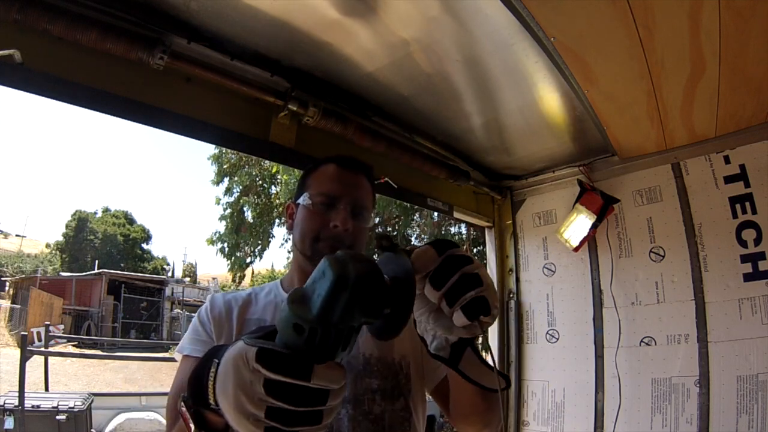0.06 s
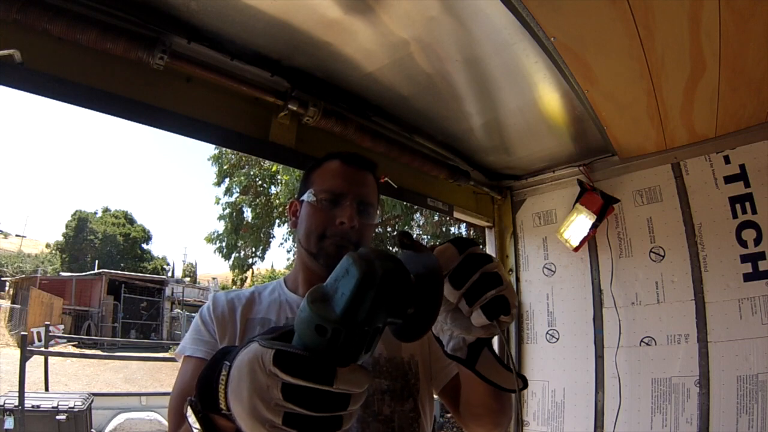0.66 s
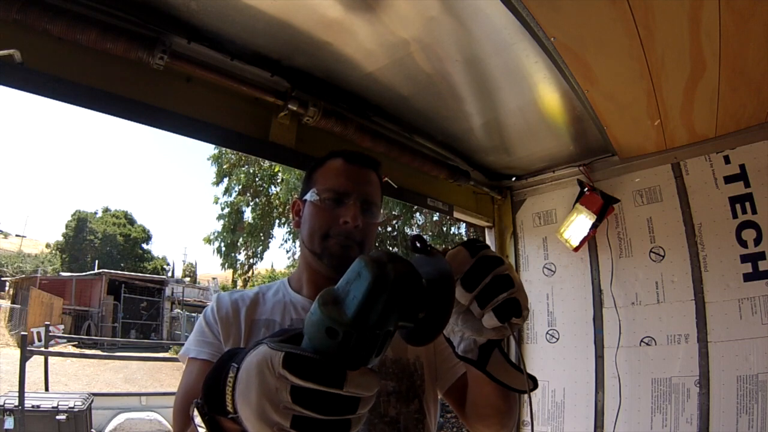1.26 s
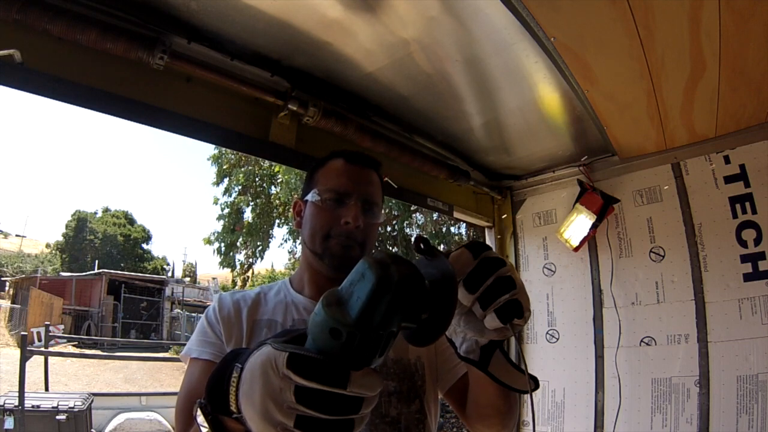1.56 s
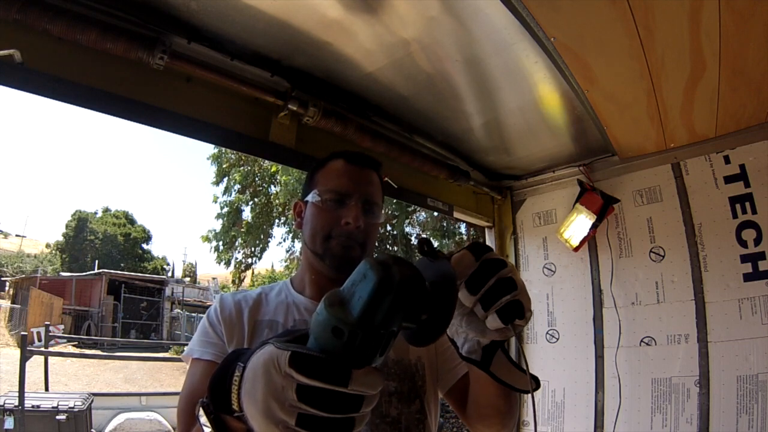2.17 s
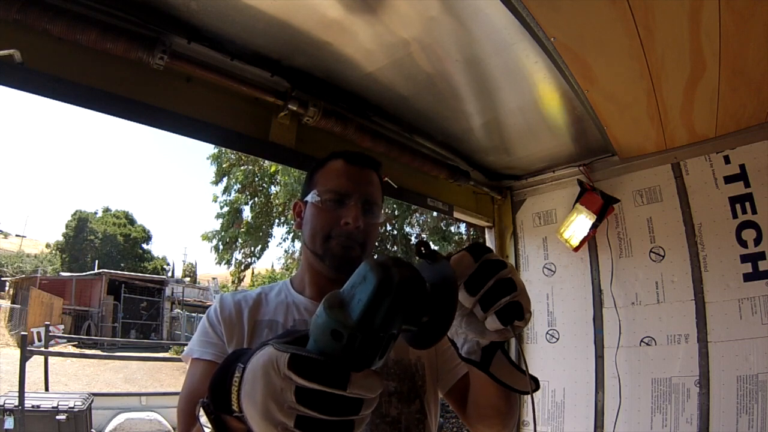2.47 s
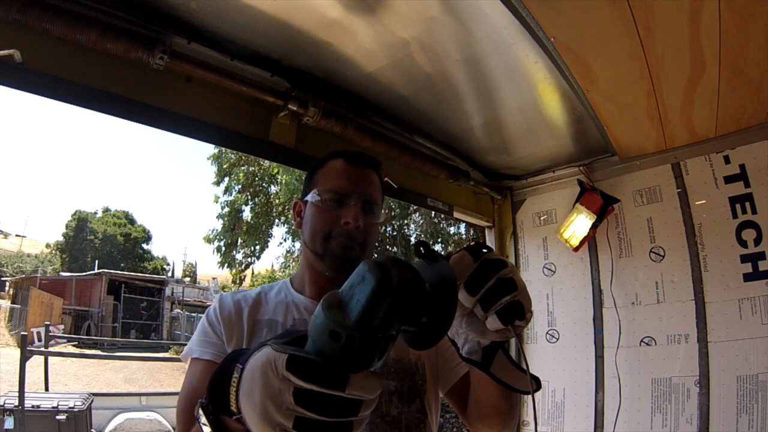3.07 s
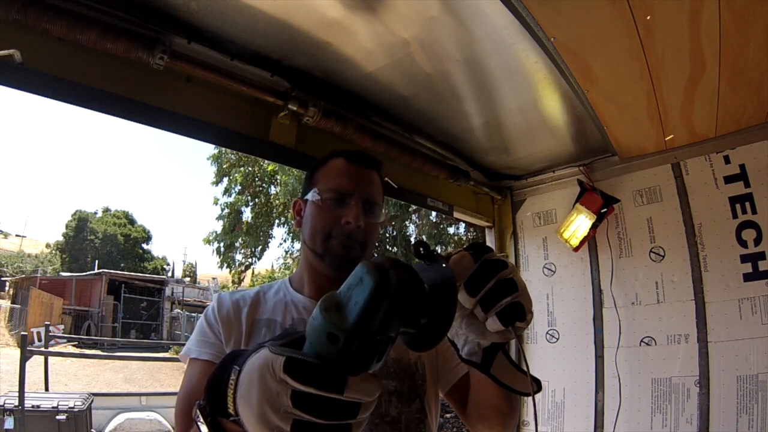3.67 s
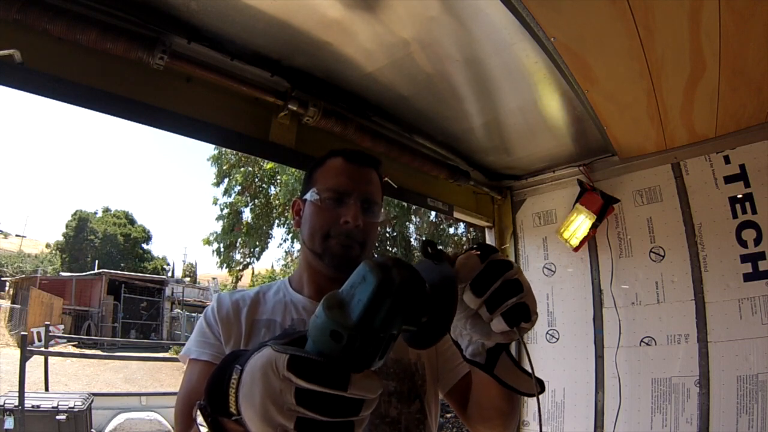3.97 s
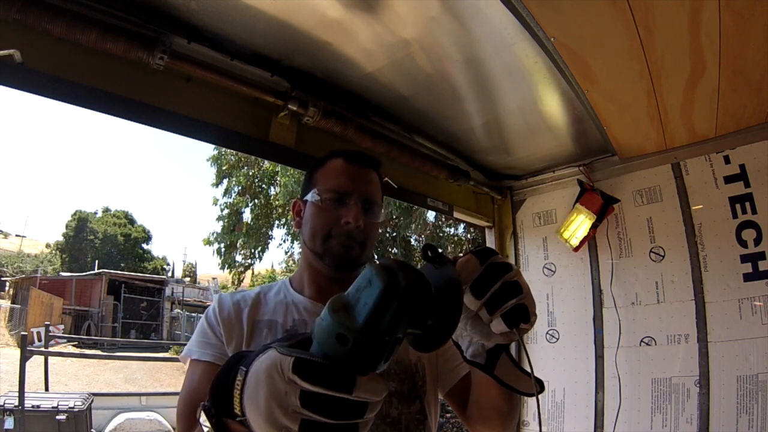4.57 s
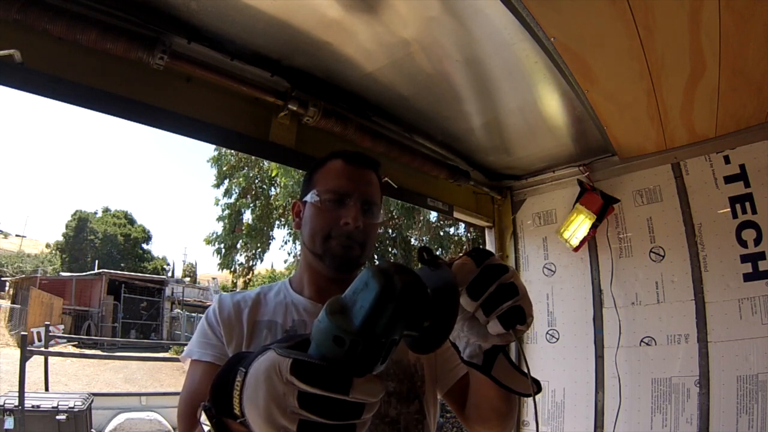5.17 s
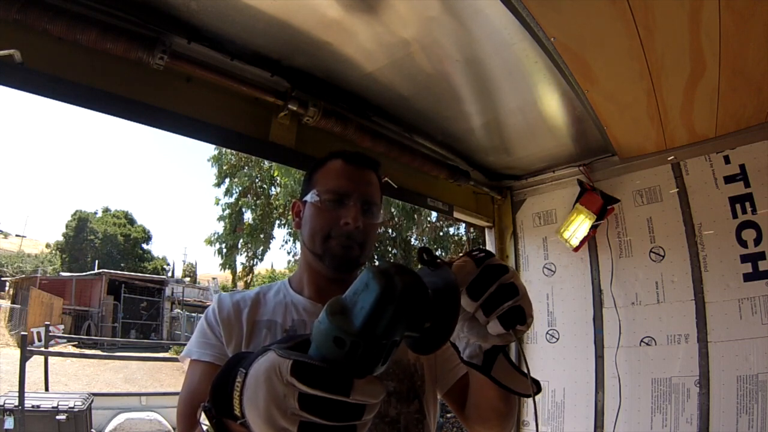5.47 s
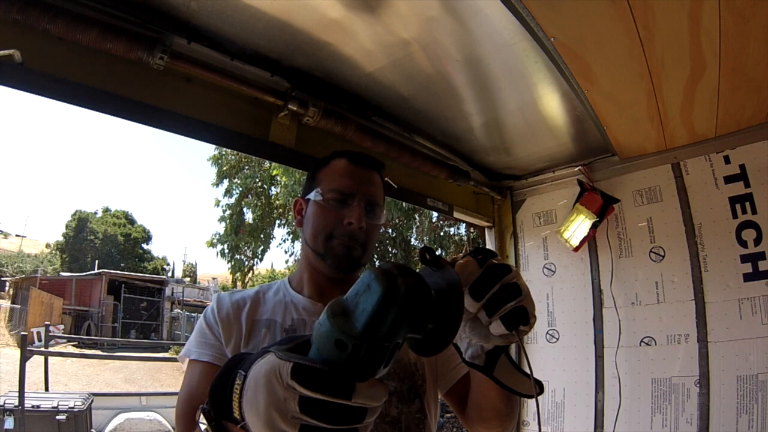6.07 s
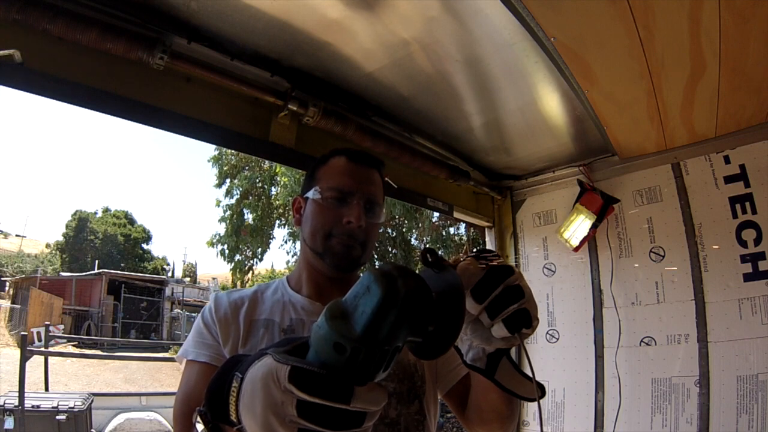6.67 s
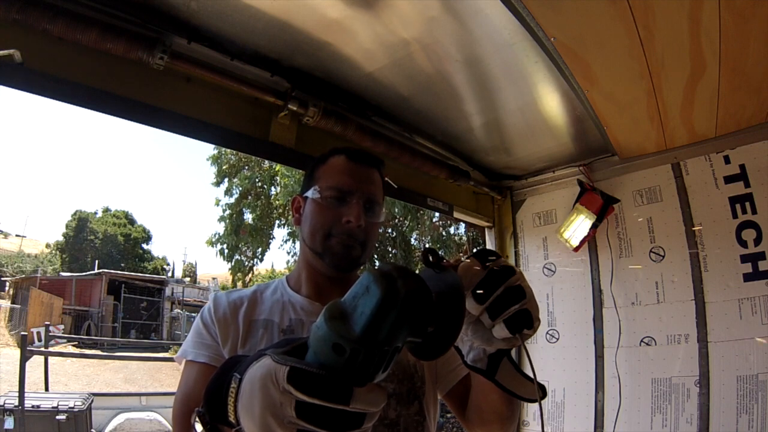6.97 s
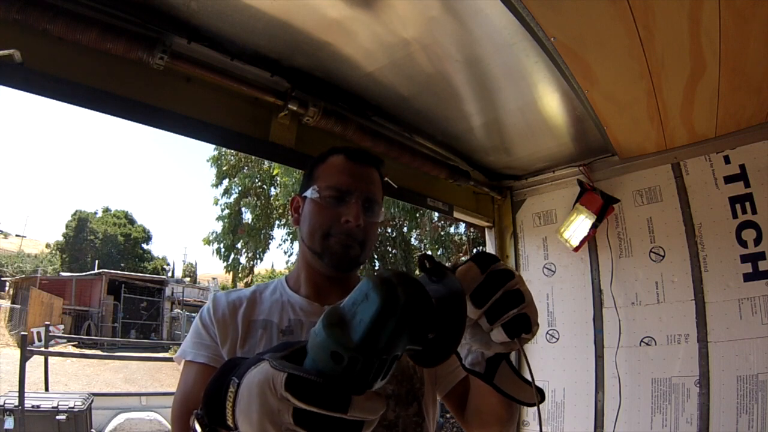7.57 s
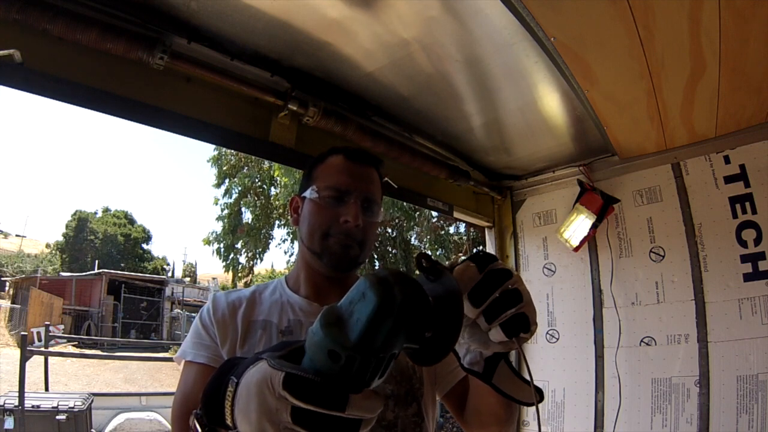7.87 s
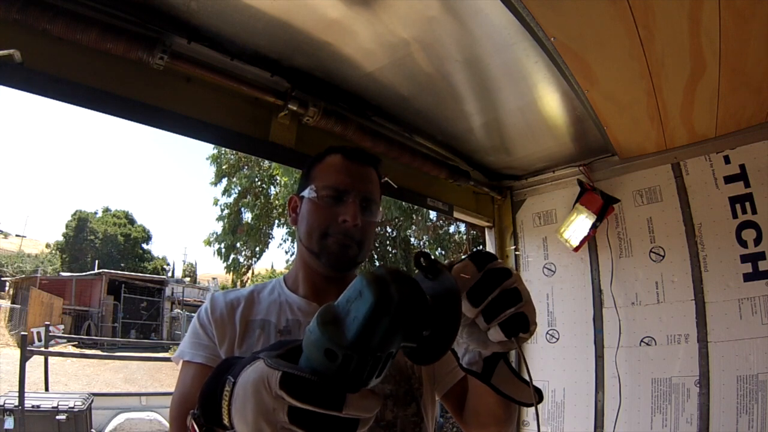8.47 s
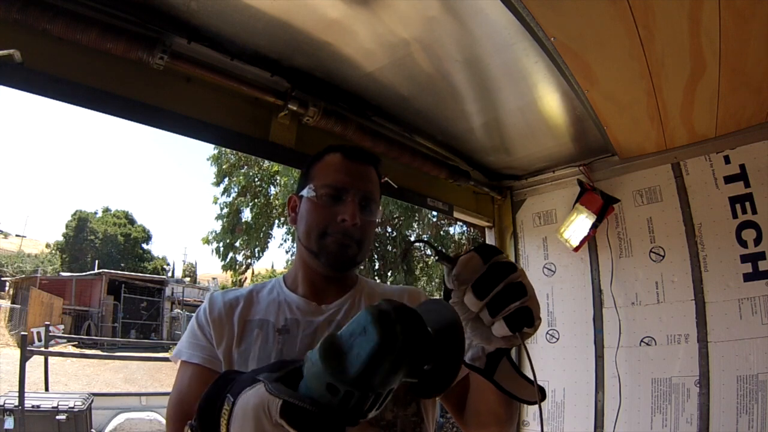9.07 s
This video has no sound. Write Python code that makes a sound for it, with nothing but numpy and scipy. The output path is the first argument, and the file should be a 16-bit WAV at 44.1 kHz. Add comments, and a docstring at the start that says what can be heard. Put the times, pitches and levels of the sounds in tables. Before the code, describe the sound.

A handheld angle grinder cuts steadily into steel near the microphone, its shrill whine mixed with gritty hiss. Brief screeches and ringing squeals come with each push, and the pitch sags a little during the deepest bite. The grinding then stops, leaving a swelling rush of air from the spinning tool, until a small steel piece lands with a sharp clink and the level drops. A faint draught rumbles underneath.

```python
"""An angle grinder works a steel piece, close by. From the start the wheel's high spot slaps the steel
once a turn, and its grit draws a whine, a bright scrape and a rasp over the hum of the gears.
Short screeches break in, and it squeals as it is pushed; near 7 s it bites deep, slows and recovers.
At 8.7 s it is lifted off and runs free in a rush of fan air, and the level comes up.
Half a second later the steel piece clinks down and the level ducks."""
import sys
import numpy as np
from scipy import signal
from scipy.fft import rfft, irfft, next_fast_len
from scipy.io import wavfile
from scipy.ndimage import uniform_filter1d, map_coordinates

SR = 44100
rng = np.random.default_rng(int(sys.argv[2]) if len(sys.argv) > 2 else 0)


def transcribe(u):
    """Save the signal u as a 16-bit wav file named by the first command-line argument.

    u: samples, shape (n,) or (channels, n), limited to [-1, 1]; the rate is SR.
    q: integer samples, one column per channel.
    """
    v = np.clip(np.atleast_2d(u).T, -1, 1)
    q = np.round(v * 32767).astype(np.int16)
    wavfile.write(sys.argv[1], SR, q)


N = 411453

LIFT_OFF_S = 8.718
RING_DB, RING_PER_BITE_DB = -18.6, .7  # base level of whine and scrape, and its rise at full bite
# short screeches, most followed by a brief dip in level: start_s, level_db, length_s, dip_db
SCREECHES = [(.446, -13, .003, 0), (.451, -20, .025, 3.7), (1.64, -23.5, .025, 1.5), (2.234, -15, .008, 0),
             (2.242, -27, .022, 4), (3.903, -17.5, .03, 3.5), (4.209, -20, .035, .5), (6.835, -21, .03, .5),
             (7.285, -22.5, .05, 0), (7.39, -27, .035, 2.5), (8.732, -19, .006, 0), (8.779, -24, .012, 0)]
# the steel piece is set down and bounces: start_s, level_db
CLINKS = [(9.2645, -5), (9.2805, -17), (9.311, -24)]
# sound cut by fine grit all round the rim, not by the high spot: frequency_hz, power_share
ALL_ROUND = [(3500, 0.76), (5600, 0.32), (6200, 0.026), (7300, 0.022), (8200, 0.65), (13000, 0.54)]


def amp(db):
    """Decibels to gain."""
    return 10 ** (np.asarray(db) / 20)


def unit(x):
    """Scale to rms 1."""
    return x / np.sqrt(np.mean(x ** 2) + 1e-20)


def along(points, hz):
    """Read (frequency_hz, value) points on a log axis."""
    frequencies, values = np.transpose(points)
    return np.interp(np.log(hz + 1), np.log(frequencies + 1), values)


def curve(points, t):
    """Read (time_s, value) points at times t."""
    return np.interp(t, *np.transpose(points))


def envelope(age, held_s, attack_s, release_s):
    """A linear attack, a hold and an exponential release."""
    return np.clip(age / attack_s, 0, 1) * np.exp(-np.maximum(age - held_s, 0) / release_s)


def wobble(rate):
    """A smooth random curve, rate knots a second."""
    knots = rng.standard_normal(int(N * rate / SR) + 4)
    smooth = signal.resample(knots, len(knots) * 10)
    return np.interp(np.arange(N), np.linspace(0, N, len(smooth)), smooth)


def filtered(x, response):
    """Filter x with a complex response of frequency."""
    size = next_fast_len(N + SR // 4)
    return irfft(rfft(x, size) * response(np.fft.rfftfreq(size, 1 / SR)), size)[..., :N]


def noise(spectrum, gate=1):
    """Gated noise with a colour, rms 1."""
    return unit(filtered(gate * rng.standard_normal(N), lambda hz: amp(along(spectrum, hz))))


def touching(t):
    """1 while the wheel is on the steel, then 0."""
    return np.clip((LIFT_OFF_S - t) / .012 + .5, 0, 1)


def wheel_speed(t, spin_up_hz_per_s=9):
    """Turns a second: held down by the hand's load, then climbing freely."""
    # speed under load: time_s, rotation_hz
    loaded_speed = [(0.0, 172.1), (0.56, 171.0), (0.92, 170.9), (1.45, 170.0), (1.74, 169.0), (2.18, 168.4),
                    (2.3, 167.0), (3.46, 169.3), (3.88, 169.1), (3.95, 167.7), (4.21, 168.0), (4.26, 167.4),
                    (6.23, 168.9), (6.64, 168.3), (7.25, 166.2), (7.41, 164.2), (7.88, 168.1),
                    (8.31, 169.3), (8.63, 169.0), (8.7, 168.4)]
    return curve(loaded_speed, t) + spin_up_hz_per_s * np.maximum(t - LIFT_OFF_S, 0)


def bite_depth(t, resting=.14, attack_s=.05, release_s=.15):
    """Each push sinks the rim in, then eases out. At 0 only the high spot touches, at 1 all of it cuts."""
    # the hand leans in: start_s, held_s, bite
    pushes = [(2.21, .16, .76), (3.88, .3, .62), (4.4, .85, .33), (6.81, .7, .97), (8.33, .38, .58)]
    extra = [(depth - resting) * envelope(t - start, held, attack_s, release_s)
             for start, held, depth in pushes]
    return np.clip(resting + np.max(extra, axis=0), 0, 1)


def contact(turns, bite, slap_db=11, sharpness=2.4):
    """Contact force around one turn: a bump at the high spot, which flattens as the rim bites."""
    high_spot = np.exp(sharpness * (np.cos(2 * np.pi * turns) - 1))
    return amp(slap_db * (1 - 0.8 * np.clip(bite, 0, 1)) * high_spot)


def resonance_db(hz, width_hz=85):
    """Wheel and steel resonate in contact and lift the frequencies near each peak."""
    # contact resonances: centre_hz, lift_db
    peaks = [(2365, 5.5), (2530, 3.5), (3560, 6.8), (3880, 3.5), (4390, 7), (4890, 4), (5050, 7.5),
             (5560, 3.5), (6240, 5.5), (6490, 3.5), (7090, 4.5), (7400, 6.8), (8200, 7.5), (8420, 3.5),
             (8600, 3.5), (8790, 3), (8940, 8.5), (10150, 4), (10440, 6.5), (10950, 6), (11970, 3.5),
             (12480, 4.5)]
    grid = np.linspace(0, SR / 2, 2 ** 12)
    return np.interp(hz, grid, sum(db * np.exp(-((grid - centre) / width_hz) ** 2) for centre, db in peaks))


def draught(t, level_db=-58.8, duck_db=5.2):
    """A soft draught rumbles on each microphone port, more so once the tool is lifted away."""
    # rumble colour: frequency_hz, relative_db
    rumble = [(20, -2), (45, 1.5), (120, -.5), (260, -1.5), (600, -9), (1500, -26), (4000, -46)]
    gain = amp(level_db - duck_db * touching(t) + 1.5 * wobble(8.5))
    return gain * np.array([noise(rumble), noise(rumble)])


def gear_hum(turns, waver_db=1.5):
    """Spindle and gears hum in wavering tones that follow the wheel's speed."""
    # hum partials: speed_multiple
    orders = [1, 2, 36 / 11, 4, 5, 6, 72 / 11, 14, 15]
    # strength of each partial: level_db
    levels = [-68, -67, -59.5, -52.3, -60.5, -59, -53.5, -53.5, -51]
    return sum(amp(db + waver_db * wobble(9)) * np.sqrt(2)
               * np.sin(2 * np.pi * order * turns + rng.uniform(0, 2 * np.pi))
               for order, db in zip(orders, levels))


def fan_air(t, turns, level_db=-16.3, rise_db=9.5, rise_s=.135, duck_db=13.5, vent_hz=3650, vent_db=3.3):
    """Fan air rushes through the vents of the free-running tool."""
    # air colour: frequency_hz, relative_db
    colour = [(59, -69), (100, -47), (462, -20), (630, -20), (728, -14.5), (993, -14), (1100, -10),
              (1700, -10.5), (2000, -7.5), (2620, -8.5), (3810, -3.5), (6250, -3.5), (7220, -9.5),
              (11900, -26.5), (14000, -36)]
    gusts = contact(turns, 0, slap_db=1.0) * rng.standard_normal(N)
    vents = lambda hz: amp(along(colour, hz) + vent_db / (1 + ((hz - vent_hz) / 250) ** 2))
    rush = unit(filtered(gusts, vents))
    # the airflow is steady; only the gain comes up after lift-off and ducks at the first clink
    held_down = np.exp(-np.maximum(t - LIFT_OFF_S, 0) / rise_s)
    ducked = np.clip((t - CLINKS[0][0]) / .013, 0, 1)
    return (1 - touching(t)) * amp(level_db - rise_db * held_down - duck_db * ducked) * rush


def clinks(crack_db=-11, crack_t60_s=.034, attack_s=.00037):
    """The steel piece rings at each bounce; it is too small to radiate bass."""
    # modes of the free steel: pitch_hz, relative_db, t60_s
    modes = [(3526, -18, .07), (4870, -18, .06), (5222, -23, .1), (6500, -12, .06), (6650, 3.5, 0.037),
             (6680, -13.5, .22), (7500, -8, .04)]
    out, t = np.zeros(N + SR), np.arange(SR // 4) / SR
    for start, db in CLINKS:
        ring = sum(amp(level + rng.normal(0, 1) - 60 * t / t60) * np.sin(2 * np.pi * (hz * t + rng.random()))
                   for hz, level, t60 in modes)
        crack = amp(crack_db - 60 * t / crack_t60_s) * rng.standard_normal(len(t))
        out[round(start * SR):][:len(t)] += amp(db) * (ring + crack) * (1 - np.exp(-t / attack_s))
    return signal.sosfilt(signal.butter(2, [1500, 10000], "band", fs=SR, output="sos"), out[:N])


def screeches(t, turns):
    """Short bursts of contact noise ring the wheel's modes."""
    # modes of the wheel: centre_hz, width_hz, relative_db
    modes = [(2530, 150, -6), (4150, 320, -9), (5300, 250, -3), (6350, 300, -3), (7000, 350, 0),
             (8250, 350, -9), (10300, 700, -15.5), (12300, 600, -23)]
    bursts = sum(amp(db) * np.clip((t - start) / .001, 0, 1)
                 * np.exp(-(np.maximum(t - start, 0) / length) ** 2) for start, db, length, _ in SCREECHES)
    body = lambda hz: sum((-1) ** k * amp(db) * 1j * hz * width / (centre ** 2 - hz ** 2 + 1j * hz * width)
                          for k, (centre, width, db) in enumerate(modes))
    return bursts * unit(filtered(contact(turns, .8) * rng.standard_normal(N), body))


def dips_db(t, attack_s=.016, recovery_s=.1):
    """The level dips briefly after most screeches and soon comes back."""
    total_db = 0
    for start, _, length, dip in SCREECHES:
        age = t - start - length
        total_db -= dip * np.clip(age / attack_s, 0, 1) * np.exp(-(age / recovery_s) ** 2)
    return total_db


def scrape(t, turns, trim_db=-5.0, grain_db=1.0, ringing=0.4, scatter_db=-5.5):
    """Grains tear off fresh steel: a bright scrape in step with the high spot, and a spray of hiss."""
    # scrape colour: frequency_hz, relative_db
    spectrum = [(400, -50), (2470, -23), (3500, -5), (4400, -11), (4960, -9), (5400, 1), (7130, 1.5),
                (7730, -7), (8200, -1.5), (8600, -13), (8950, -10.5), (9450, -19), (10300, -13),
                (11500, -21), (12600, -17.5), (13800, -36)]
    bite = bite_depth(t)
    force = contact(turns, bite, slap_db=9, sharpness=2.2)
    force *= amp(grain_db * wobble(900)) / np.sqrt(uniform_filter1d(force ** 2, size=1024))
    colour = lambda hz: amp(along(spectrum, hz) + ringing * resonance_db(hz))
    slap = filtered(force * rng.standard_normal(N),
                    lambda hz: colour(hz) * np.sqrt(1 - along(ALL_ROUND, hz)))
    hiss = filtered(rng.standard_normal(N), lambda hz: colour(hz) * np.sqrt(along(ALL_ROUND, hz)))
    # the highest hiss scatters off the walls and differs between left and right
    scattered = filtered(rng.standard_normal(N),
                         lambda hz: colour(hz) * amp(scatter_db) / (1 + (8050 / (hz + 1)) ** 12))
    gain = amp(RING_DB + trim_db + (RING_PER_BITE_DB - 3.5) * bite)
    return gain * unit(slap + hiss + np.array([scattered, -scattered]))


def rasp(t, turns, trim_db=-.5):
    """The grit drags over the steel in a broad rasp that barely pulses with the turn."""
    # rasp colour: frequency_hz, relative_db
    colour = [(71, -71), (120, -41.5), (162, -37), (286, -28.7), (537, -18), (619, -21.5), (669, -19),
              (759, -16.7), (1430, -10), (1500, -9.5), (2180, -9.5), (4660, -6), (5200, -4), (6760, -39),
              (11400, -120)]
    # slow swells of the rasp: time_s, level_db
    swells = [(0, -26.7), (4.3, -27.9), (4.95, -24.9), (5.6, -27), (7.3, -28.8), (7.75, -26.3), (8.5, -28)]
    return amp(curve(swells, t) + trim_db) * noise(colour, contact(turns, bite_depth(t), slap_db=0.5))


def rim_harmonics(t, contact_force, wear_rate, evenness, count, size=256):
    """The rim's grit pattern repeats every turn and slowly wears: its harmonics at times t."""
    patterns = rng.standard_normal((size, size))
    wear = np.clip(t * wear_rate, 0, size - 2)
    index, fade = wear.astype(int), (wear % 1)[:, None] * np.pi / 2
    grit = patterns[index] * np.cos(fade) + patterns[index + 1] * np.sin(fade)
    harmonics = rfft(grit * contact_force(np.arange(size) / size))[:, :count]
    harmonics /= np.sqrt(np.mean(abs(harmonics) ** 2, axis=1, keepdims=True))
    harmonics /= (abs(harmonics) ** 2 + .05) ** (evenness / 2)
    return harmonics / np.sqrt(np.mean(abs(harmonics) ** 2))


def whine(turns, comb_db=-4, bite_db=2.0, flutter_db=1.55, frame_hz=100, count=82, size=2048):
    """The grit pattern drives the steel: a comb of wheel harmonics, a few of which sing out."""
    # colour of a light skim: frequency_hz, relative_db
    skim = [(600, -60), (1760, -26), (2400, -19), (3000, -16), (4690, -14.5), (5350, -8), (5920, -2),
            (6460, -1), (7200, -1.5), (7800, -11), (8300, -12.5), (9080, -16.5), (9600, -27),
            (10400, -14.5), (11400, -23), (12500, -17), (13500, -27)]
    # colour of a full cut: frequency_hz, relative_db
    cut = [(1180, -65), (2000, -25), (2520, -9), (2710, -15.5), (3310, -19), (3940, -6), (4630, -16),
           (4930, -7.5), (5390, 3), (5980, -4.5), (6320, -2.5), (6900, -1.5), (9650, -14.5), (10300, -15.5),
           (13500, -23)]
    # harmonics that chatter under a deep bite: speed_multiple
    chatter_orders = [15, 23, 24, 26, 30, 31, 33, 39, 44, 48, 49, 61, 64]
    # strength of each at full bite: level_db
    chatter_db = [-42, -40, -34, -38, -28.5, -33, -30, -32, -32, -37, -36, -42, -42]
    # a harmonic sings as the speed carries it through a mode of the steel:
    # speed_multiple, mode_hz, half_width_hz, off_mode_db, on_mode_lift_db, full_bite_change_db
    singing = [(9, 1508, 5.5, -46.7, 7.3, -3), (32, 5370, 25, -36, 4, 0), (38, 6450, 110, -29.2, 5, -5),
               (41, 6915, 45, -36, 7.5, 0)]
    # the steel locks onto one harmonic and squeals: start_s, held_s, speed_multiple, level_db
    squeals = [(.58, .09, 32, -28), (2.26, .22, 61, -37), (2.39, .09, 32, -23), (3.98, .2, 32, -25.5),
               (3.98, .45, 30, -32), (4.27, .17, 32, -23.5), (6.6, .68, 41, -25.5), (6.85, .37, 32, -26),
               (7.22, .2, 24, -30.5), (7.28, .27, 33, -24), (7.55, .1, 32, -28.5), (7.85, .1, 32, -28.5),
               (8.33, .16, 32, -26), (8.33, .39, 26, -35), (8.42, .3, 33, -27)]
    t = np.arange(int(N / SR * frame_hz) + 2) / frame_hz
    bite = bite_depth(t)[:, None]
    hz = wheel_speed(t)[:, None] * np.arange(count)
    slap_force = lambda angle: contact(angle, bite, slap_db=13, sharpness=1.8)
    slap = rim_harmonics(t, slap_force, wear_rate=3.0, evenness=0.66, count=count)
    fine = rim_harmonics(t, np.ones_like, wear_rate=4.5, evenness=0.73, count=count)
    fine_share = along(ALL_ROUND, hz)
    drive = np.sqrt(1 - fine_share) * slap + np.sqrt(fine_share) * fine

    level = (1 - bite) * amp(along(skim, hz)) + bite * amp(along(cut, hz))
    level *= amp(resonance_db(hz) * (1 - 0.93 * bite))
    level /= np.linalg.norm(level, axis=1, keepdims=True)
    level *= amp(RING_DB + comb_db + (RING_PER_BITE_DB + bite_db) * bite)
    level[:, chatter_orders] = np.maximum(level[:, chatter_orders], bite ** 4 * amp(chatter_db))
    for order, mode_hz, width_hz, db, lift_db, pressed_db in singing:
        detuning = (hz[:, round(order)] - mode_hz) / width_hz
        level[:, round(order)] = amp(db + lift_db / (1 + detuning ** 2) + pressed_db * bite[:, 0])
    for start, held, order, db in squeals:
        squeal = amp(db) * envelope(t - start, held, attack_s=.03, release_s=.04)
        level[:, round(order)] = np.maximum(level[:, round(order)], squeal)
    # a resonating mode evens out the slow changes in its drive
    resonating = [round(row[0]) for row in singing] + chatter_orders
    drive[:, resonating] /= np.sqrt(abs(drive[:, resonating]) ** 2 + 0.027)
    # grains break away, so every harmonic flutters on its own
    level *= amp(flutter_db * unit(uniform_filter1d(rng.standard_normal(drive.shape), size=5, axis=0)))
    # each frame holds the waveform of one turn, read at the wheel's angle
    one_turn = irfft(drive * level, size) * size / np.sqrt(2)
    frame, angle = np.arange(N) * frame_hz / SR, turns % 1 * size
    return map_coordinates(one_turn, [frame, angle], order=1, mode="grid-wrap")


def grinding(t, turns, judder_db=0.95, treble_hz=11400):
    """Wheel on steel: whine, scrape and rasp judder together while the top treble slowly brightens."""
    # shelf above treble_hz: time_s, gain_db
    shelf = [(0, -4), (1.6, 0), (7.1, 0), (7.7, 2.5), (8.7, 1.5)]
    judder = amp(judder_db * wobble(150))  # no two turns press equally hard
    sound = judder * whine(turns) + np.sqrt(judder) * (scrape(t, turns) + rasp(t, turns))
    sound *= touching(t) * amp(dips_db(t))
    treble = filtered(sound, lambda hz: 1 - 1 / (1 + (hz / treble_hz) ** 20))
    return sound + (amp(curve(shelf, t)) - 1) * treble


def microphone_ports(sound):
    """Two close ports lift the treble, where they also differ most in level and phase."""
    # treble lift at both ports: frequency_hz, lift_db
    lift = [(8500, 0), (10200, 2.5), (11200, 1.6), (12500, 6.5)]
    # level difference: frequency_hz, left_minus_right_db
    balance = [(200, 0), (700, .8), (1200, 0), (7000, 0), (9000, -2.7), (13000, -4)]
    # phase difference: frequency_hz, left_lead_rad
    phase = [(7000, 0), (8100, 0.4), (8440, 0.15), (9200, 1.38), (10200, 1.36), (11000, 0.98), (12800, 2.5)]
    side = np.array([[.5], [-.5]])
    gain = lambda hz: amp(along(lift, hz) + side * along(balance, hz))
    return filtered(sound, lambda hz: gain(hz) * np.exp(1j * side * along(phase, hz)))


def scene():
    """One turning wheel times all of the grinder's layers; the clinks and a draught join them."""
    t = np.arange(N) / SR
    turns = np.cumsum(wheel_speed(t) * (1 + .0003 * wobble(30))) / SR
    grinder = grinding(t, turns) + screeches(t, turns) + gear_hum(turns) + fan_air(t, turns)
    return microphone_ports(grinder + clinks()) + draught(t)


def record(dry, top_hz=13800):
    """A steep low-pass takes off the very top."""
    return filtered(dry, lambda hz: 1 / np.sqrt(1 + (hz / top_hz) ** 120))


dry = scene()
out = record(dry)
transcribe(out)
```